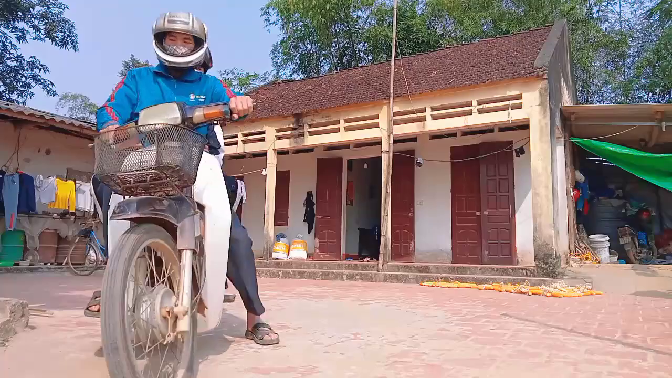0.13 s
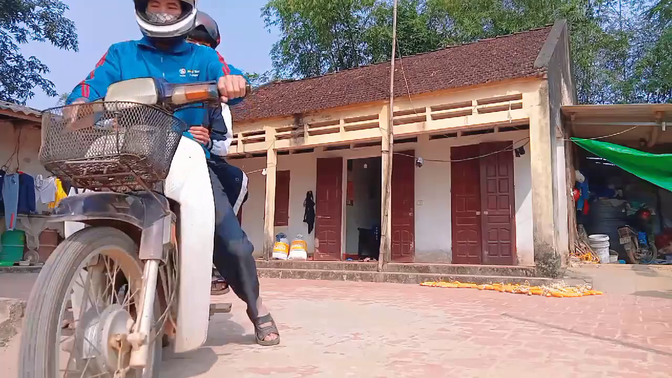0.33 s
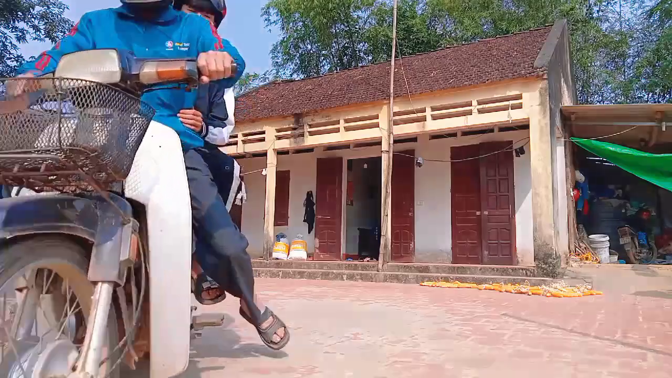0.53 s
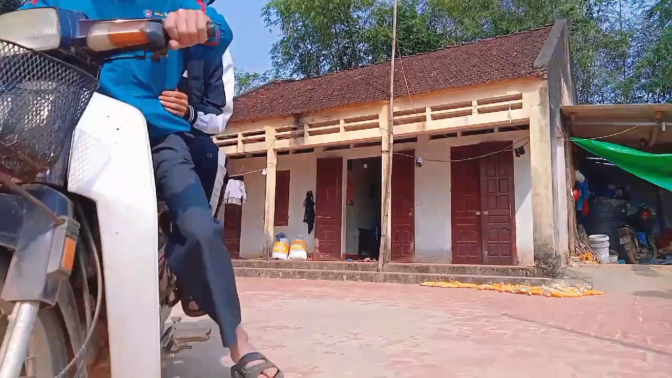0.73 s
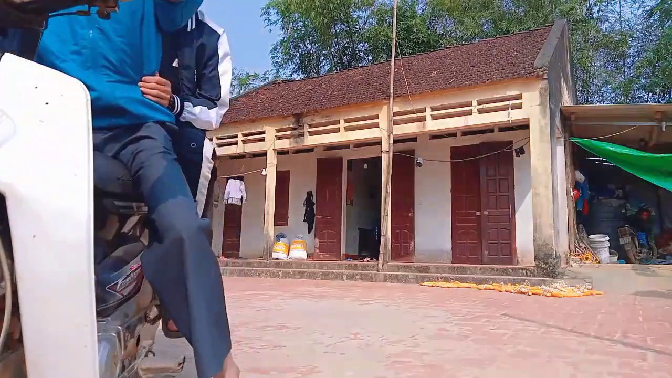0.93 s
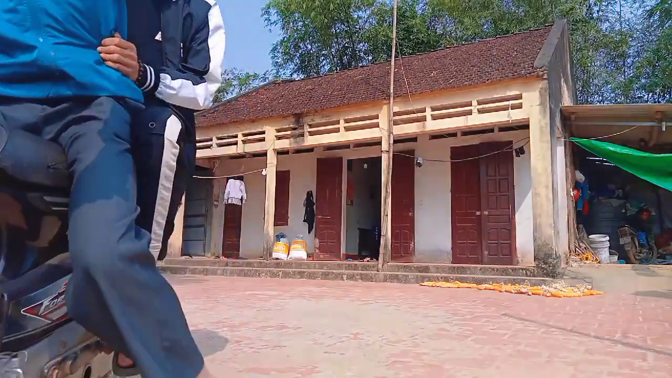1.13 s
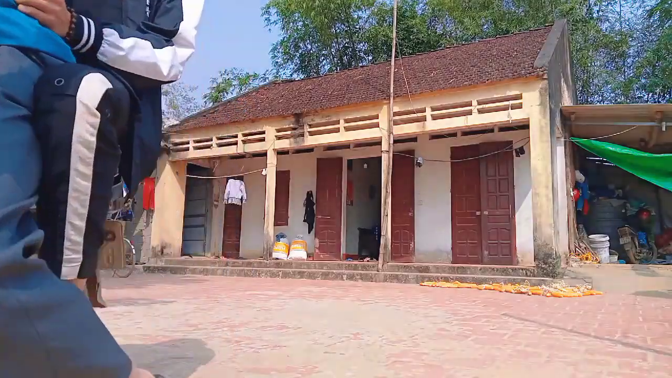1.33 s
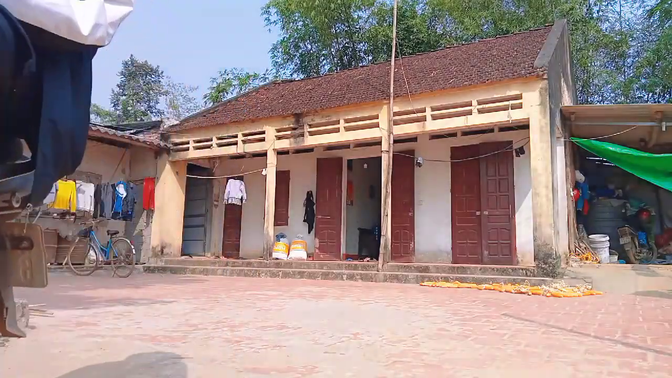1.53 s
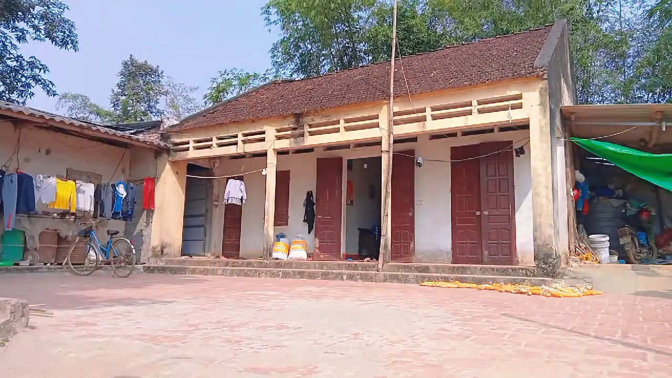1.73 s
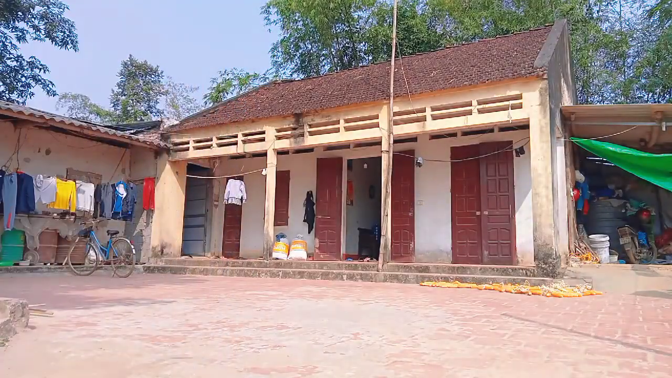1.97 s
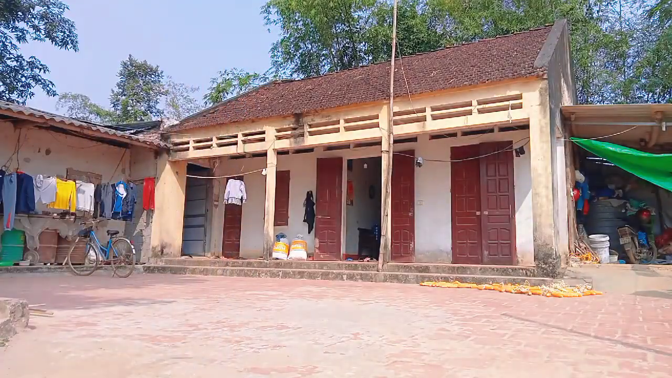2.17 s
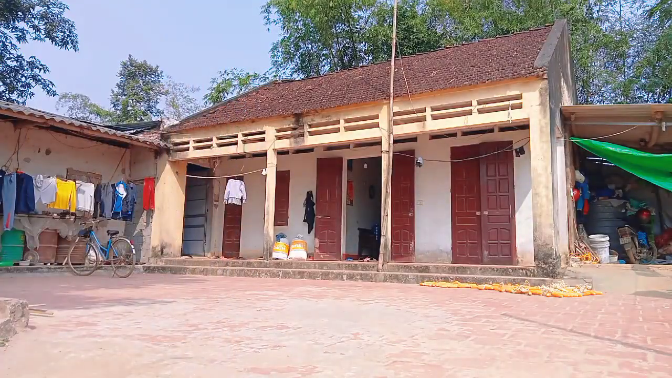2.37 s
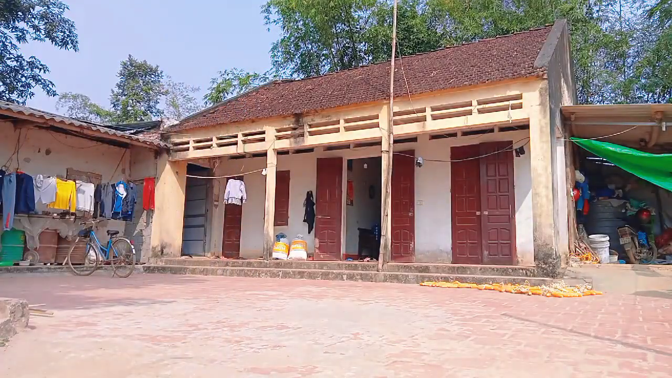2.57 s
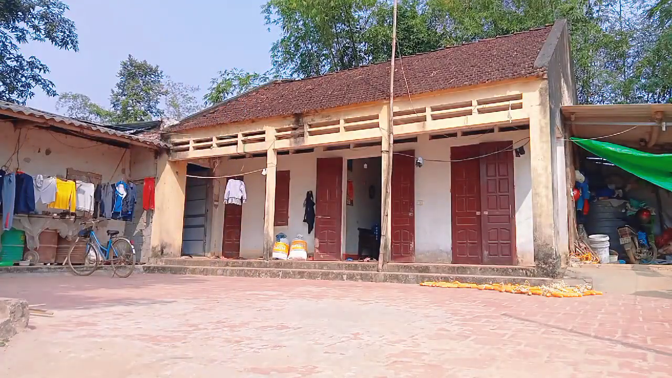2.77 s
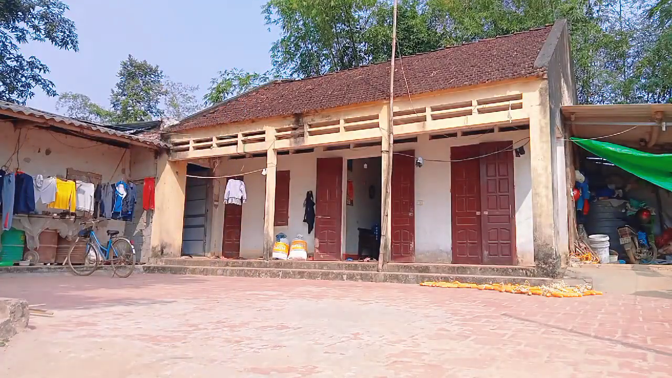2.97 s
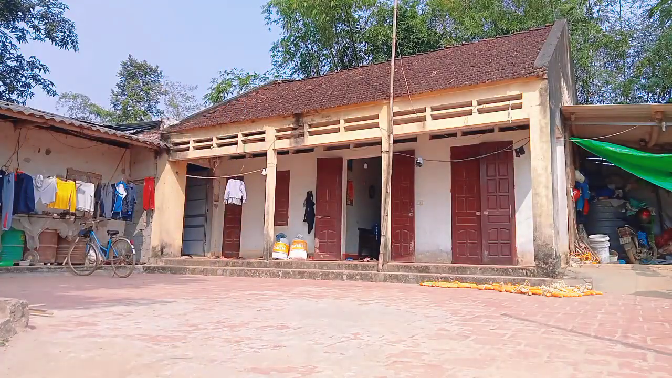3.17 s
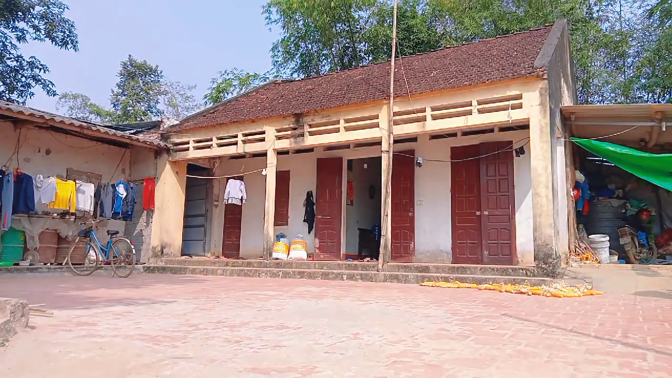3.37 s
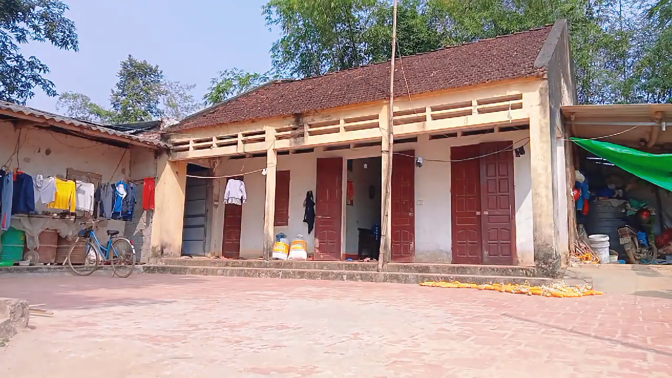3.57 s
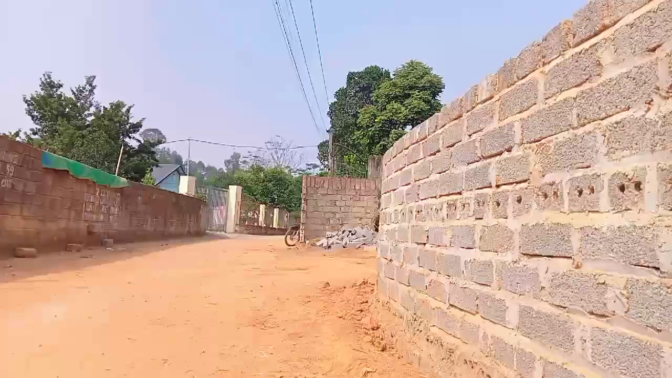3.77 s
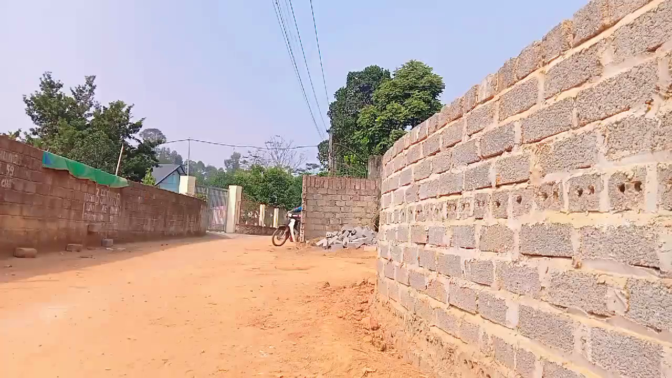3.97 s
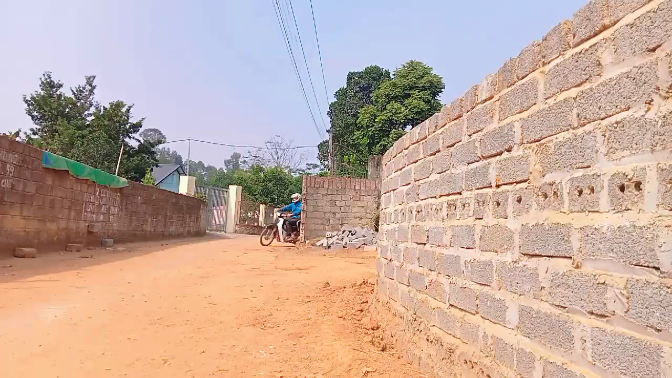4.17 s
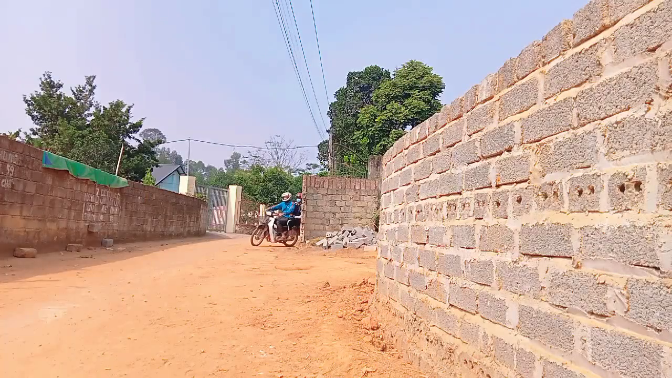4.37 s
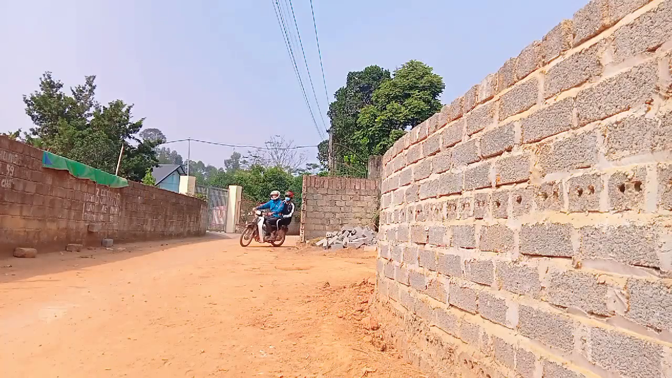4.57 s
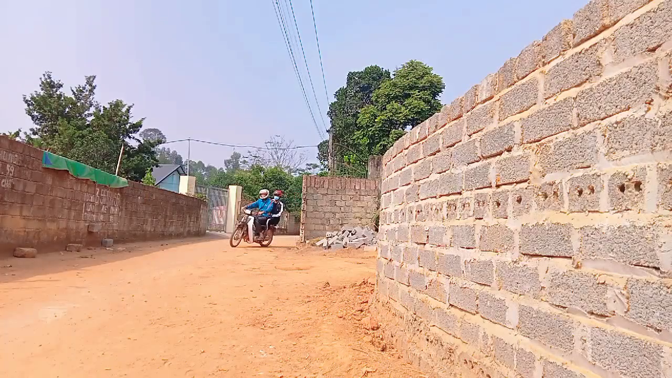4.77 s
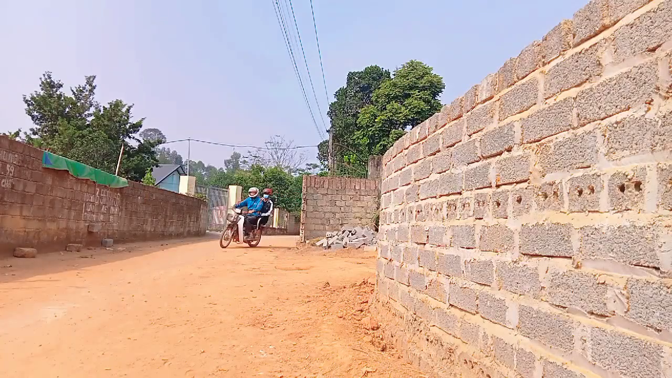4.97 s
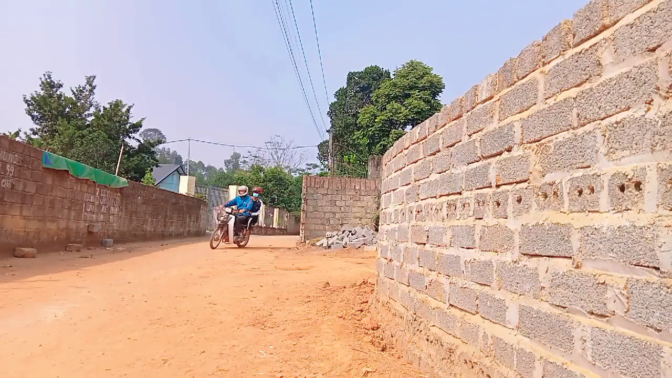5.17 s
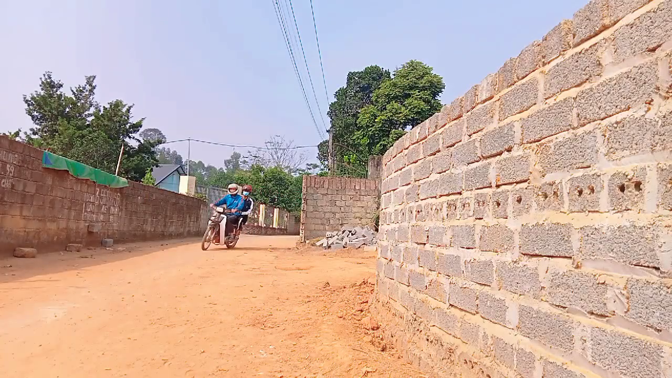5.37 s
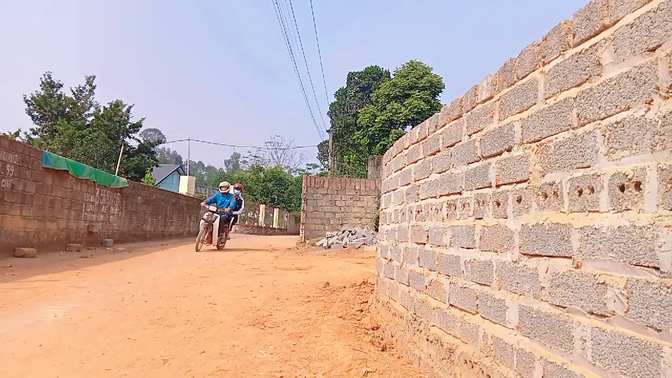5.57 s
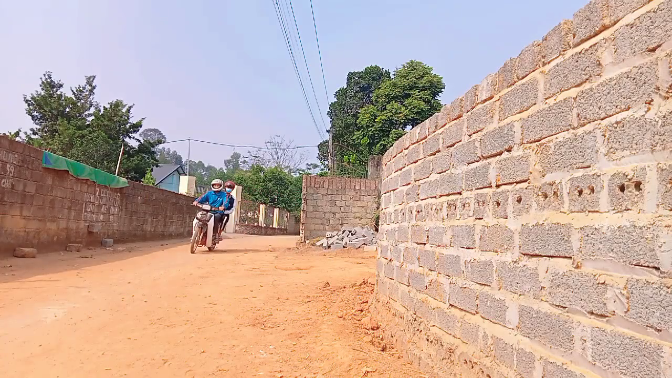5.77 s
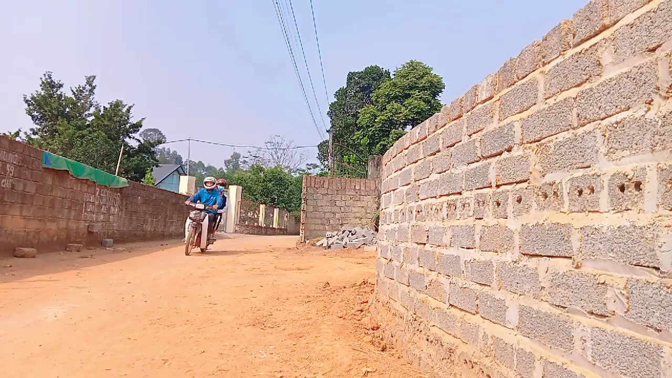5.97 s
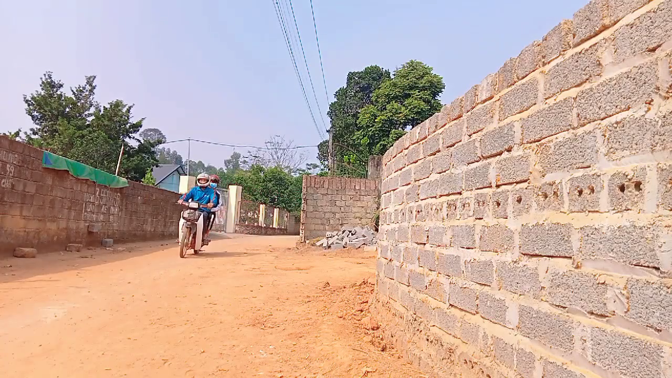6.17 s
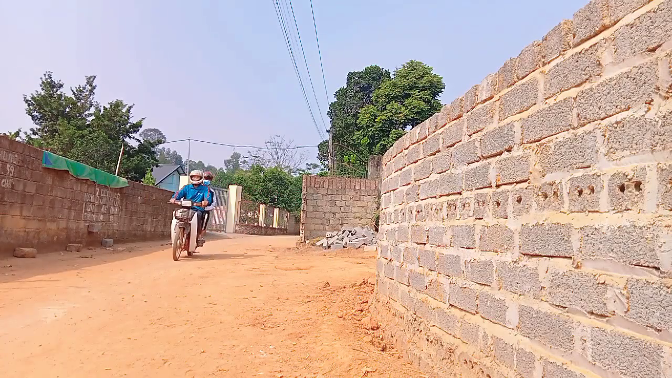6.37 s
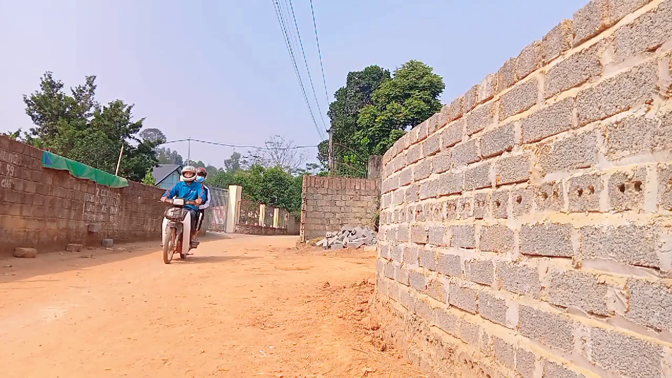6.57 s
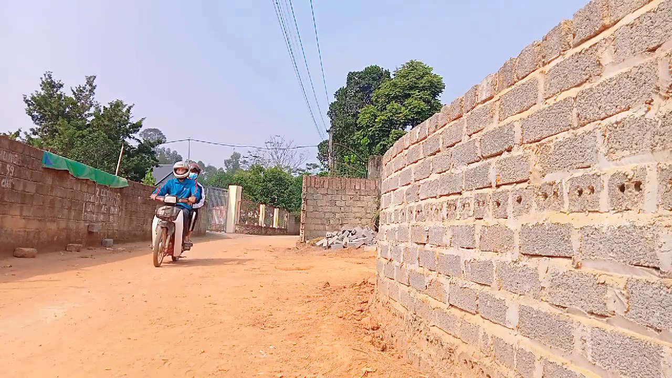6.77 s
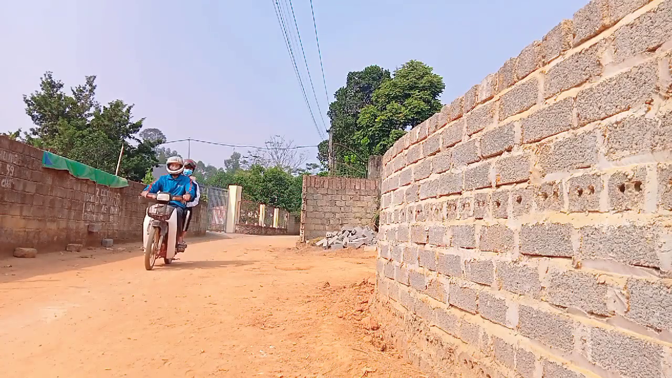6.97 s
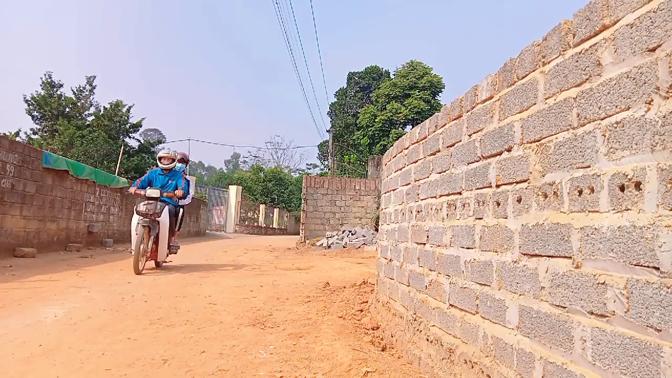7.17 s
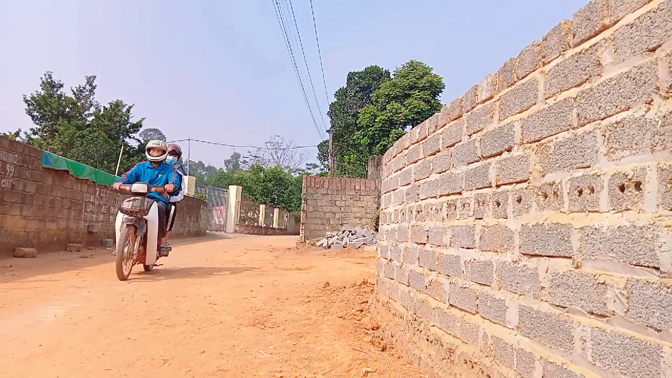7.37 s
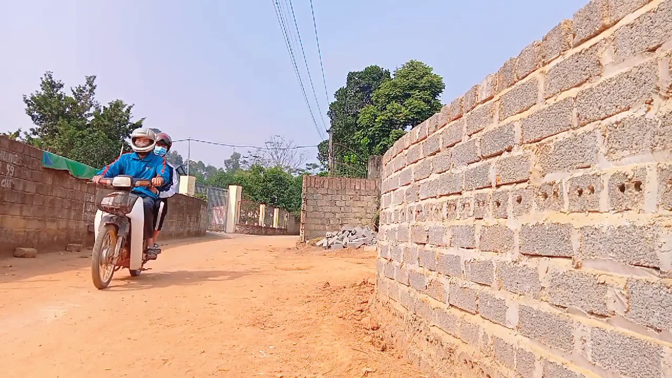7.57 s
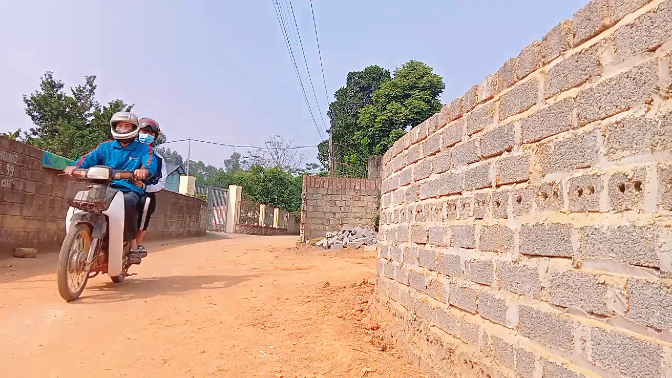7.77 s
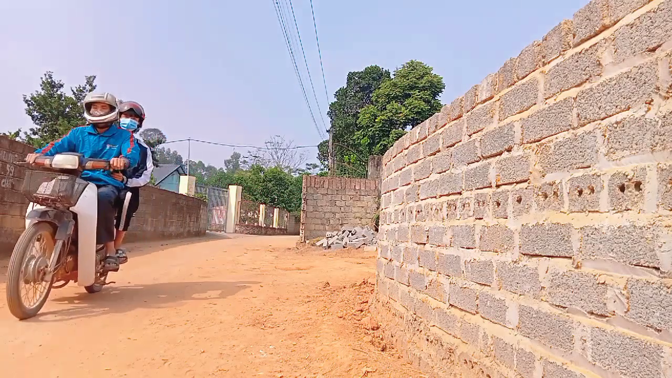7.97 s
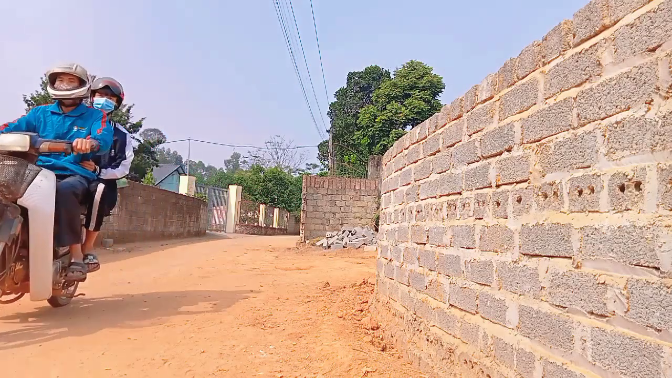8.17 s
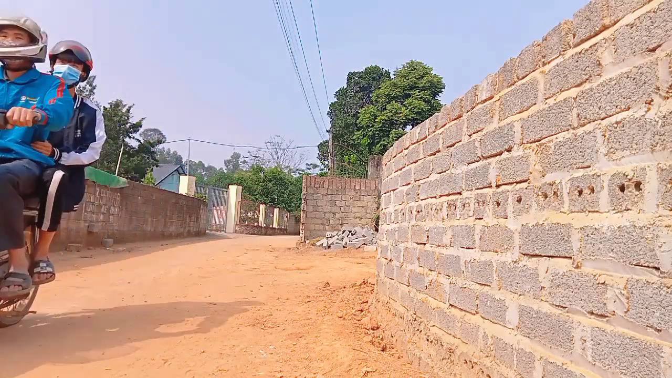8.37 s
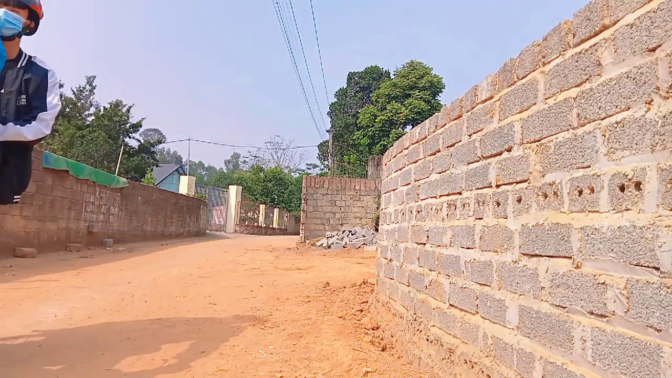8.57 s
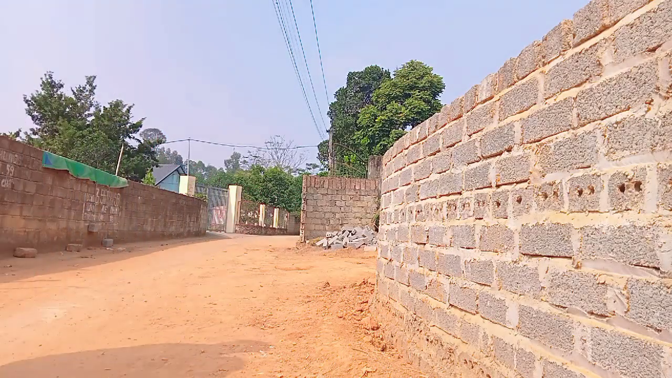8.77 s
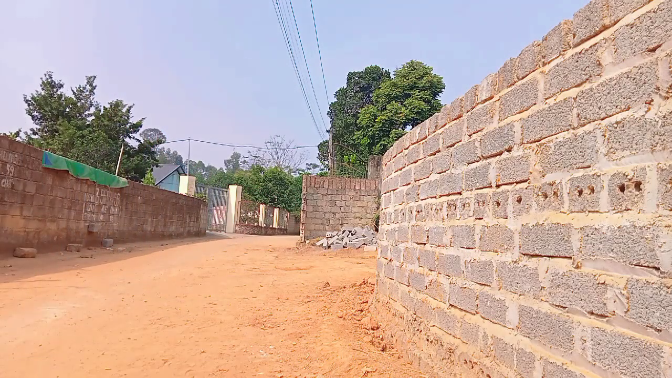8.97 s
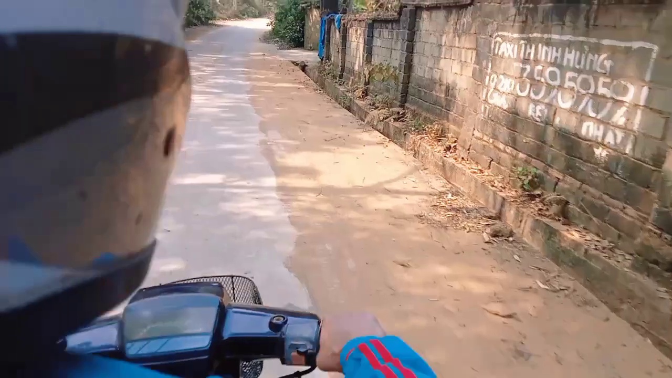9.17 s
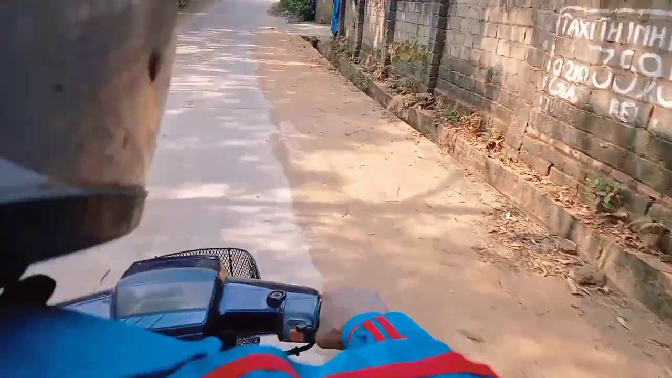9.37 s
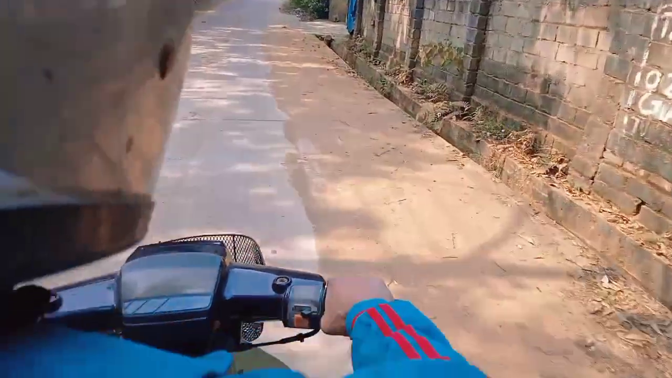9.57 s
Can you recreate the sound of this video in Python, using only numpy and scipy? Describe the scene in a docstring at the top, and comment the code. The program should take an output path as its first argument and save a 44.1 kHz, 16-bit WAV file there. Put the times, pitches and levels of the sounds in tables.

```python
"""A paved yard, then a walled dirt lane. A small single-cylinder four-stroke motorbike chugs past close by;
after a hard cut it rounds a corner into the lane, opens up, comes near, throttles back and is cut off.
Every firing rings the silencer and shakes the engine case; gas spits from the tailpipe and valves tick.
Tyres hiss and crack grit, loose parts clink, and the walls colour the drone with their echoes.
Quiet outdoor air lies underneath, with three faint whistles in the distance."""
import sys
import numpy as np
from scipy import signal
from scipy.fft import rfft, irfft, next_fast_len
from scipy.io import wavfile

SR = 44100
rng = np.random.default_rng(int(sys.argv[2]) if len(sys.argv) > 2 else 0)


def wav_out(sig):
    """Save sig, one row per channel (or a flat mono array), as 16-bit PCM at SR to the path in sys.argv[1]."""
    wavfile.write(sys.argv[1], SR, np.round(np.clip(np.atleast_2d(sig).T, -1, 1) * 32767).astype(np.int16))


N = 423801
TIME = np.arange(N) / SR
CUT_S, END_S = 3.657, 9.138

# outdoor air bed: f/Hz, level/dB
AIR_SPECTRUM = [(15, -49.5), (25, -14.5), (86, -2.5), (250, -13.5), (879, -29), (1060, -39),
                (1390, -38.5), (3440, -42.5), (5140, -61), (7480, -56.5), (15000, -88)]
# engine revs: t/s, firing rate/Hz
YARD_REVS = [(0, 17.3), (.163, 16.6), (.407, 16.1), (.66, 15.58), (.918, 15.32), (1.177, 15.68),
             (1.405, 14.88), (1.61, 14.4), (1.85, 14.25), (2.07, 13.8), (2.28, 14.08), (2.57, 13.54),
             (2.86, 13.95), (3.66, 13.92)]
LANE_REVS = [(3.66, 10.2), (4.0, 9.7), (4.4, 17.65), (4.52, 18.55), (4.7, 18.87), (4.85, 19.52),
             (5.0, 20.76), (5.2, 20.53), (5.6, 21.18), (5.9, 21.36), (6.07, 20.92), (6.5, 21.42),
             (6.85, 21.48), (7.22, 21.96), (7.5, 21.6), (7.8, 21.28), (8.13, 21.68), (8.4, 21.55),
             (8.68, 21.4), (8.971, 12.746)]
# twist grip: t/s, throttle (0 shut, 1 open)
YARD_GRIP = [(0, 0.93), (2.45, 0.84), (3.66, 0)]
LANE_GRIP = [(3.98, 1), (4.55, 0.82), (8.72, 1), (8.79, 0.54)]
# moments when a firing burns poorly: t/s, level change/dB
POOR_BURNS = [(1.308, -4.5), (1.441, -4), (1.926, -3), (2.07, -10), (8.769, -0.5)]
# silencer body from the front and from the rear, and its overtones: f/Hz, width/Hz, level/dB
THUD_FRONT = [(81, 30, -6.3), (107.3, 76, 1.9), (134, 35, -8.2), (313, 29, -14.9), (244, 162, -6.5)]
THUD_REAR = [(55, 151, .5), (83, 35, -3.8), (115, 20, -7.5), (294.5, 26, -15.8)]
PIPE_OVERTONES = [(400.5, 19, -1.5), (455.3, 18, 1.5), (543.7, 26, -1), (688, 56, -12.5)]
# ring of the engine case and cooling fins: f/Hz, width/Hz, level/dB
METAL_MODES = [(788, 92, -5), (930, 45, -10), (1360, 210, -3.5), (1663, 65, -10.5), (2110, 130, -7.5),
               (2324, 290, -5.5), (2755, 170, -9), (3260, 260, -5.5), (3500, 200, -9)]
# tone of the engine clatter, tailpipe hiss, cracking grit and tyre hiss: f/Hz, level/dB
YARD_CLATTER_EQ = [(60, -0.5), (400, -2), (550, 2.5), (728, -2), (887, 1), (1510, -9), (2150, -8.5),
                   (2510, -8), (2730, -10.5), (3280, -8.5), (4850, -32), (6340, -27), (7300, -19),
                   (9260, -35), (14900, -36.5), (15800, -35.5)]
LANE_CLATTER_EQ = [(60, -2.5), (200, 2), (420, 5), (600, 0), (759, -1), (1030, -3.5), (1180, -4),
                   (1510, -3.5), (2760, -14.5), (3310, -11.5), (4220, -22), (5200, -58), (6760, -61),
                   (11400, -120)]
JET_EQ = [(400, -25), (800, 3), (1500, 8), (2300, -18), (3300, 1.5), (5000, -19), (7400, -4), (10000, -18),
          (15500, -29)]
CRUNCH_EQ = [(500, -22), (1400, 9), (3300, 8), (5000, -12), (7400, 3), (9500, -15.5), (15000, -19)]
TYRE_EQ = [(2650, -41.5), (4500, -10.5), (5160, -10.5), (6400, -5.5), (7450, 2.5), (8730, -10.5),
           (13300, -16.5), (14900, -13.5), (15800, -16.5)]
# the silencer's steel shell, changing with the side that faces the listener: t/s, f/Hz
YARD_SHELL_PITCH = [(0, 800), (0.6, 860), (1.25, 900), (1.55, 810), (1.9, 740), (2.5, 795)]
# rasp rung by the gas jet: t/s, hoarse f/Hz, hoarse level/dB, sharp level/dB, chink level/dB
RASP_CURVES = [(1.85, 1510, -49.5, -64.5, -78.5), (2.16, 1550, -37.5, -40, -76.5),
               (2.3, 1700, -39, -48.5, -71.5), (2.56, 1850, -39, -53, -66.5), (2.74, 1900, -46, -45, -54),
               (2.93, 1910, -48.5, -43, -68), (3.05, 1600, -73, -41, -65), (3.16, 1420, -46, -59, -54),
               (3.6, 1410, -47, -77, -53)]
# loose parts and flicked grit: t/s, level/dB, f/Hz, width/Hz, t60/s
CLINK_CUES = [(0.865, -41, 4100, 500, 0.097), (1.176, -33.5, 3880, 1507, 0.06),
              (1.178, -33, 7200, 2480, 0.062), (1.262, -18, 930, 250, 0.076),
              (1.265, -38, 7560, 2010, 0.14), (1.595, -23, 1130, 203, 0.14), (1.72, -28, 3000, 1480, 0.06),
              (1.725, -38, 13000, 6000, .03), (1.878, -18, 776, 200, 0.072),
              (2.125, -30.5, 2310, 200, 0.22), (2.704, -40, 14200, 2440, 0.034),
              (2.849, -42, 14700, 1990, 0.025), (3.012, -49, 13500, 5000, .02),
              (3.233, -46, 14000, 4000, .02), (3.607, -41.5, 7700, 1480, 0.12),
              (4.722, -32.5, 1790, 1200, 0.06), (5.97, -44, 8600, 9000, .025),
              (6.354, -33, 1490, 700, 0.077), (8.097, -42.5, 12000, 2500, 0.088),
              (8.27, -41, 7600, 1200, .05), (8.477, -36.5, 8400, 3010, .025),
              (8.511, -39, 12000, 5000, .025), (8.628, -39, 8800, 8000, 0.081),
              (8.835, -35.5, 1470, 400, .08), (8.895, -25.5, 1020, 130, 0.13),
              (8.958, -37, 7600, 2500, 0.07), (9.055, -39, 7550, 1800, .04),
              (9.08, -26, 14800, 2005, 0.016)]
# exhaust boom and bark, as the lane walls favour one pitch, then another: t/s, f/Hz, level/dB
BOOM_CURVES = [(3.85, 95, -62), (4.15, 107, -39), (4.6, 126.6, -33.5), (5.0, 112, -32), (5.3, 102, -31.5),
               (5.62, 122, -25), (5.83, 101, -31), (6.15, 120.3, -23), (6.45, 102.6, -27), (6.85, 109, -30),
               (7.2, 101, -33), (7.45, 126, -22.5), (7.75, 119, -23.5), (8.1, 113.5, -18),
               (8.4, 113.3, -16), (8.73, 110, -18.5), (8.8, 107.4, -29.5), (9.1, 103, -34.5)]
BARK_CURVES = [(3.95, 288, -57.5), (4.55, 309, -42), (5.1, 313, -37), (5.7, 315, -32), (6.3, 327.5, -30),
               (6.6, 314, -30.5), (7.08, 317, -24), (7.45, 312, -26.5), (7.7, 324, -29),
               (8.1, 330.4, -25.5), (8.36, 329, -27.5), (8.58, 309, -21.5), (8.73, 312, -23.5),
               (8.8, 310, -36.5), (9.1, 309.5, -39.5)]
# faders for the deepest bass, hollow note, scattered echoes and lane clatter: t/s, level/dB
DEEP_FADER = [(3.7, -56), (4.25, -43), (4.55, -31.5), (4.75, -33.5), (4.95, -36), (5.35, -44), (6.1, -38),
              (7.0, -37.5), (7.5, -39), (7.9, -57), (8.55, -30.5), (8.85, -38.5), (9.1, -29)]
HOLLOW_FADER = [(3.95, -61), (4.5, -41.5), (5.0, -36.5), (5.4, -42.5), (6.0, -48), (6.8, -42.5),
                (7.7, -34.5), (8.72, -36), (8.8, -47.5)]
FAR_FADER = [(3.9, -59), (4.5, -42.5), (4.85, -36), (5.3, -42), (6.5, -42), (7.6, -42), (8.7, -47),
             (8.8, -56)]
CLATTER_FADER = [(5.5, 1), (6.5, 2), (7.4, 3.5), (8.1, -1), (8.65, -1), (8.9, -0.5), (9.1, -2.5)]
# pitches that the far walls throw back: f/Hz, width/Hz, level/dB
FAR_WALL_MODES = [(433, 65, 5.5), (690, 145, 5.5)]
# the listener's mirror images in the side walls and end wall: along/m, across/m, share reflected
WALL_IMAGES = [(0, 4.312, .95), (0, 7.872, .95), (-25.06, 1.678, .7)]
# bounce off the dirt: t/s, lag/ms
GROUND_BOUNCE = [(3.7, 1.1), (4.3, 0.94), (5.5, .76), (6.4, 0.84), (7.5, 1.2), (8.05, 1.47), (8.7, 2.07),
                 (9.1, 1.53)]
# hollow band of engine noise, falling as the bike nears, near 1 kHz as it passes: t/s, f/Hz, level/dB
LANE_BAND_CURVES = [(5.8, 1200, -64), (6.5, 1060, -47.5), (6.9, 920, -43.5), (7.45, 830, -44),
                    (8.1, 704, -40), (8.45, 850, -55.5), (8.65, 1100, -33.5), (8.9, 970, -39.5),
                    (9.1, 930, -40.5)]
# thin band in the distant bike's noise: t/s, f/Hz, level/dB
THIN_BAND_CURVES = [(3.66, 1075, -58), (4.4, 1244, -54), (4.9, 1250, -63), (5.4, 1260, -77)]
# distant whistles: t/s, length/s, start f/Hz, end f/Hz, level/dB
WHISTLE_CUES = [(3.927, 0.2, 2930, 3010, -62), (4.47, 0.078, 3240, 2370, -51),
                (5.405, 0.075, 3300, 2180, -49)]
# level laws: nearest level/dB, loss per doubled distance/dB, loss with throttle shut/dB, view change/dB
# (the view change applies from behind in the yard, and behind the corner in the lane)
YARD_THUD, YARD_CASE = (-20, 2, 10, 7.5), (-31.5, 10, -3, 4)
YARD_JET, YARD_SHELL = (-56, -2.1, 9.5, 12), (-39, 9.5, 13, 13)
LANE_OVERTONES, LANE_TICK = (-36, 5.5, 30.5, -28), (-47.5, 6, 2.5, -8.5)
LANE_CASE, LANE_TYRES, LANE_RATTLE = (-31, 3.5, 6, -15), (-46, 5, 2.5, -11.5), (-46, 14.5, -11.5, 1)


def gain_of(db):
    """Decibels to amplitude."""
    return 10 ** (np.asarray(db) / 20)


def unit_rms(x):
    """Scales to an rms of one."""
    return x / np.sqrt(np.mean(x ** 2) + 1e-20)


def noise():
    """Fresh white noise."""
    return rng.standard_normal(N)


def curves(rows):
    """One automation curve per column after the time, in straight ramps."""
    s, *columns = np.transpose(rows)
    return [np.interp(TIME, s, c) for c in columns]


def bump(x, centre, width):
    """A bell-shaped swell."""
    return np.exp(-((x - centre) / width) ** 2)


def wander(per_s):
    """A random drift of unit rms."""
    knots = np.arange(0, TIME[-1] + 1, 1 / per_s)
    return unit_rms(np.interp(TIME, knots, rng.standard_normal(len(knots))))


def coloured(x, spectrum):
    """Shapes a sound with an EQ curve, at unit rms."""
    hz, db = np.transpose(spectrum)
    size = next_fast_len(N)
    shape_db = np.interp(np.log(np.fft.rfftfreq(size, 1 / SR) + 1), np.log(hz), db)
    return unit_rms(irfft(rfft(x, size) * gain_of(shape_db), size)[:N])


def softened(x, edge_hz):
    """A gentle low-pass that rounds off attacks."""
    return signal.sosfilt(signal.butter(1, edge_hz, fs=SR, output="sos"), x)


def resonate(x, hz, width_hz):
    """A steep resonance whose pitch can glide, at unit rms."""
    carrier = np.exp(2j * np.pi * np.cumsum(hz * np.ones(len(x))) / SR)
    pole = np.exp(-np.pi * width_hz / SR)
    return unit_rms((carrier * signal.lfilter([1], [1, -2 * pole, pole * pole], x / carrier)).real)


def echo(x, lag_ms):
    """A shifted copy; the lag can follow a changing path."""
    return np.interp(TIME - lag_ms / 1000, TIME, x)


def add(mix, s, sound):
    """Mixes a sound in at a time."""
    part = mix[round(s * SR):][:len(sound)]
    part += sound[:len(part)]


def ride(nearest_s, nearest_m, m_per_s):
    """A straight, steady pass: metres past the listener, metres away, and nearness (1 when closest)."""
    along = m_per_s * (TIME - nearest_s)
    distance = np.hypot(along, nearest_m)
    return along, distance, nearest_m / distance


def loudness(law, nearness, throttle, view):
    """Gain of one part of the bike, from its distance, the throttle and how it is seen (0-1)."""
    nearest_db, falloff_db, shut_db, view_db = law
    return gain_of(nearest_db + falloff_db * np.log2(nearness) - shut_db * (1 - throttle) + view_db * view)


def crank(revs, firing_at_s, uneven_db, jitter_s):
    """The cylinder fires once a cycle: firing rate, place in the cycle (0-1) and slightly uneven kicks."""
    rate, = curves(revs)
    cycles = np.cumsum(rate) / SR
    cycles -= np.interp(firing_at_s, TIME, cycles)
    firings = np.flatnonzero(np.diff(np.floor(cycles)))
    strength, slip = rng.standard_normal((len(firings), 2)).T
    weak_db = sum(db * (abs(firings / SR - s) < .02) for s, db in POOR_BURNS)
    onsets = np.clip(firings + (slip * jitter_s * SR).astype(int), 0, N - 1)
    kicks = np.zeros(N)
    kicks[onsets] = gain_of(uneven_db * strength + weak_db) * np.sqrt(SR / rate[firings])
    return rate, cycles % 1, kicks


def turbulent(kicks, rough, decay_s):
    """A short rush of noise trails each kick, so that no two are alike."""
    fall = np.exp(-np.arange(SR // 10) / SR / decay_s)
    return kicks + rough * noise() * signal.oaconvolve(kicks, fall / np.linalg.norm(fall))[:N]


def ring(kicks, modes):
    """Each kick rings damped modes that swing in alternate directions."""
    t = np.arange(SR // 4) / SR
    pulse = sum((-1) ** k * gain_of(db) * np.exp(-np.pi * width * t) * np.sin(2 * np.pi * hz * t)
                for k, (hz, width, db) in enumerate(modes))
    return signal.oaconvolve(kicks, pulse / np.linalg.norm(pulse))[:N]


def thuds(kicks, behind):
    """Each firing thumps the silencer; its front tone crossfades to its rear tone as the bike passes."""
    puffs = turbulent(kicks, rough=.13, decay_s=.02)
    rear = ring(puffs, THUD_REAR)
    front = ring(echo(puffs, lag_ms=-1.5), THUD_FRONT)  # slightly ahead of the rear
    overtones = ring(turbulent(kicks, rough=1.54, decay_s=.028), PIPE_OVERTONES)
    return behind * rear - (1 - behind) * front + gain_of(-28.5) * overtones


def grit(per_s, spread_db):
    """Random tiny impacts, a few of them large."""
    hits = (rng.random(N) < per_s / SR) * rng.choice([-1, 1], N)
    return unit_rms(hits * gain_of(spread_db * np.minimum(rng.exponential(1, N), 4)))


def metal(knocks):
    """The case and its fins ring, each mode swelling and fading by itself."""
    return unit_rms(sum(gain_of(db + 5.5 * wander(per_s=7)) * resonate(knocks, hz, width)
                        for hz, width, db in METAL_MODES))


def clatter(cycle, spectrum, throb, valve, ring_db):
    """The case rattles and rings most on the power stroke; a valve shuts later in the cycle."""
    shake = 1 + throb * bump(cycle, .22, .18) + valve * bump(cycle, .61, .018)
    knocks = shake * (noise() + .5 * grit(per_s=900, spread_db=2.5))
    return unit_rms(coloured(shake * noise(), spectrum) + gain_of(ring_db) * metal(knocks))


def pulsing_band(pulse, hz):
    """A hollow band of engine noise that swells with each pulse."""
    return resonate((1 + pulse) * noise(), hz, width_hz=250)


def jet(age_s):
    """Gas leaves the tailpipe in two spurts per firing, a rush between: their hiss, and the rasp they ring."""
    hoarse_hz, hoarse_db, sharp_db, chink_db = curves(RASP_CURVES)
    spurts = bump(age_s, .0045, .0016) + .35 * bump(age_s, .011, .007) + .9 * bump(age_s, .016, .0016)
    rush = .5 * spurts + bump(age_s, .014, .009)
    hiss = unit_rms(spurts * coloured(noise(), JET_EQ))
    hoarse = gain_of(hoarse_db) * resonate(rush * noise(), hoarse_hz, width_hz=650)
    sharp = gain_of(sharp_db) * resonate(spurts * noise(), hz=3070, width_hz=930)
    chink = gain_of(chink_db) * resonate(spurts * noise(), hz=4600, width_hz=360)
    return hiss, hoarse + sharp + chink


def crunch(per_s, spread_db, decay_s):
    """Grains of grit crack under the tyres, each in a short burst."""
    return coloured(turbulent(grit(per_s, spread_db), rough=5, decay_s=decay_s), CRUNCH_EQ)


def walls(x, t60, first_s):
    """Scattered echoes from masonry: sparse taps of random sign that die away."""
    t = np.arange(SR // 2) / SR
    taps = (rng.random(len(t)) < 2000 / SR) * rng.choice([-1, 1], len(t))
    taps = taps * (t > first_s) * gain_of(-60 * t / t60)
    return signal.oaconvolve(x, taps / np.linalg.norm(taps))[:N]


def yard():
    """The bike chugs by at low revs; once past, its tailpipe faces the listener."""
    along, _, nearness = ride(nearest_s=1.69, nearest_m=.81, m_per_s=1.333)
    throttle, = curves(YARD_GRIP)
    behind = .5 + .5 * np.tanh((along - .086) / .64)  # the tailpipe swings into view
    rate, cycle, kicks = crank(YARD_REVS, firing_at_s=.0429, uneven_db=-1.1, jitter_s=.000084)
    thud = thuds(kicks, behind)
    case = clatter(cycle, YARD_CLATTER_EQ, throb=.48, valve=.2, ring_db=-5.5)
    case = unit_rms(case + .3 * echo(case, lag_ms=3.15 * nearness))  # bounce off the paving
    case *= gain_of(3.5 * (rate - rate.mean()))  # louder with the revs
    shell = pulsing_band(bump(cycle, .15, .38), *curves(YARD_SHELL_PITCH))
    hiss, rasp = jet(cycle / rate)
    parts = (YARD_THUD, thud), (YARD_CASE, case), (YARD_SHELL, shell)
    bike = sum(loudness(law, nearness, throttle, behind) * sound for law, sound in parts)
    beam = behind ** 4.1  # the hiss beams narrowly backwards
    bike += rasp + loudness(YARD_JET, nearness, throttle, beam) * hiss
    bike += gain_of(-44.5) * nearness * crunch(per_s=35, spread_db=3, decay_s=.009)
    return bike + gain_of(-22) * walls(bike, t60=.2, first_s=.018)


def clinks():
    """Loose parts and flicked grit ring briefly as the bike jolts."""
    out, t = np.zeros(N), np.arange(SR // 8) / SR
    for s, db, hz, width, t60 in CLINK_CUES:
        add(out, s, gain_of(db - 60 * t / t60) * resonate(rng.standard_normal(len(t)), hz, width))
    return out


def thin_band():
    """A thin, slightly rising band in the distant bike's noise, fading as it nears."""
    hz, db = curves(THIN_BAND_CURVES)
    return gain_of(db) * resonate(noise(), hz, width_hz=128)


def between_walls(x, along, distance):
    """The walls mirror a sound, so its harmonics swell and cancel in turn as the bike moves."""
    out = x
    for along_m, across_m, share in WALL_IMAGES:
        path = np.hypot(along - along_m, across_m)
        out = out + share * distance / path * echo(x, lag_ms=1000 * (path - distance) / 343)
    return out


def exhaust(kicks, state, along, distance):
    """Each firing rings the silencer: boom, deep bass, bark and hollow note, coloured by the walls."""
    boom_hz, boom_db = curves(BOOM_CURVES)
    bark_hz, bark_db = curves(BARK_CURVES)
    push = softened(kicks, edge_hz=300)  # the exhaust valve takes a moment to open
    boom = gain_of(boom_db) * resonate(push, boom_hz, width_hz=27.6)
    deep = gain_of(*curves(DEEP_FADER)) * resonate(push, hz=81.7, width_hz=17.5)
    echoes = walls(kicks, t60=.16, first_s=.006)  # scattering smears each firing
    puffs = turbulent(kicks + .55 * echoes, rough=.17, decay_s=.015)
    bark = gain_of(bark_db) * resonate(puffs, bark_hz, width_hz=56.3)
    hollow = gain_of(*curves(HOLLOW_FADER)) * resonate(puffs, hz=224.2, width_hz=35)
    overtones = loudness(LANE_OVERTONES, *state) * ring(puffs, PIPE_OVERTONES)
    overtones = between_walls(overtones, along, distance)
    wash = turbulent(unit_rms(kicks + echoes), rough=.55, decay_s=.04)
    far = gain_of(*curves(FAR_FADER)) * ring(wash, FAR_WALL_MODES)
    return boom - deep + softened(bark - hollow + overtones, edge_hz=1600) + far


def lane_clatter(cycle, nearness):
    """The clatter's top end is shielded head-on and bare from the side; the ground bounce combs it."""
    case = clatter(cycle, LANE_CLATTER_EQ, throb=.36, valve=.067, ring_db=-14)
    dull = softened(case, edge_hz=2250)
    head_on_db, side_on_db = -11, 6
    case = dull + gain_of(head_on_db + (side_on_db - head_on_db) * nearness ** 2) * (case - dull)
    lag_ms, = curves(GROUND_BOUNCE)
    bounce = .45 * echo(softened(case, edge_hz=2600), lag_ms - .04)
    return gain_of(*curves(CLATTER_FADER)) * unit_rms(case + bounce)


def whistles():
    """Faint, fluttering glides, perhaps birds, echoing off the walls."""
    out = np.zeros(N)
    for s, length, first_hz, last_hz, db in WHISTLE_CUES:
        hz = np.linspace(first_hz, last_hz, int(length * SR))
        add(out, s, gain_of(db) * np.hanning(len(hz)) * np.sin(2 * np.pi * np.cumsum(hz) / SR))
    out *= 1 + .5 * wander(per_s=300)
    return out + .5 * walls(out, t60=.3, first_s=.01)


def valve_tick(cycle):
    """The valve gear ticks once a cycle."""
    return resonate(bump(cycle, .21, .19) * noise(), hz=3390, width_hz=740)


def clumped(spread_db, per_s):
    """A rush of fine grains that comes in irregular clumps."""
    return unit_rms(noise() * gain_of(spread_db * wander(per_s)))


def tyres(cycle):
    """Tyres hiss on the dirt, pulsing with the engine; lower and upper treble clump separately."""
    low, high = (clumped(spread_db=3, per_s=70) for _ in range(2))
    hiss = softened(low, edge_hz=8000) + high - softened(high, edge_hz=8000)
    throb = 1 + .5 * bump(cycle, .22, .2)
    return coloured(throb * (hiss + .3 * grit(per_s=700, spread_db=3)), TYRE_EQ)


def rattle(cycle):
    """The chain and loose panels chatter against the case in clusters, shaken by each firing."""
    shake = 1 + 1.2 * bump(cycle, .25, .2)
    chatter = clumped(spread_db=3.5, per_s=70) + .5 * grit(per_s=300, spread_db=3)
    return metal(shake * chatter)


def lane():
    """The bike rounds the corner and nears under throttle; scattered echoes give way to direct sound."""
    along, distance, nearness = ride(nearest_s=8.7, nearest_m=1.678, m_per_s=2.671)
    throttle, = curves(LANE_GRIP)
    hidden = np.interp(TIME, [3.96, 4.5], [1, 0])  # clearing the corner
    state = nearness, throttle, hidden
    _, cycle, kicks = crank(LANE_REVS, firing_at_s=6.9562, uneven_db=.9, jitter_s=.00004)
    case = lane_clatter(cycle, nearness)
    band_hz, band_db = curves(LANE_BAND_CURVES)
    hollow_band = gain_of(band_db) * pulsing_band(bump(cycle, .3, .17), band_hz)
    parts = [(LANE_TICK, valve_tick(cycle)), (LANE_CASE, case),
             (LANE_TYRES, tyres(cycle)), (LANE_RATTLE, rattle(cycle))]
    machinery = sum(loudness(law, *state) * sound for law, sound in parts)
    stones = gain_of(-41.5) * nearness * (1 - hidden) * crunch(per_s=140, spread_db=2.2, decay_s=.0035)
    return thin_band() + exhaust(kicks, state, along, distance) + hollow_band + stones + machinery


def scene():
    """The yard cuts to the lane over one bed of air, clinks and whistles; then everything stops dead."""
    bed = clinks() + whistles() + gain_of(-44) * coloured(noise(), AIR_SPECTRUM)
    bike = np.where(TIME < CUT_S, yard(), lane())
    return ((bike + bed) * (TIME < END_S))[None]


def record(dry):
    """The microphone sheds bass below 50 Hz; a steep low-pass trims the very top."""
    thin = signal.sosfilt(signal.butter(4, 50, "highpass", fs=SR, output="sos"), dry)
    lowpass = signal.firwin(511, 15800, window=("kaiser", 9), fs=SR)
    return signal.oaconvolve(thin, lowpass[None], "same")


dry = scene()
out = record(dry)
wav_out(out)
```